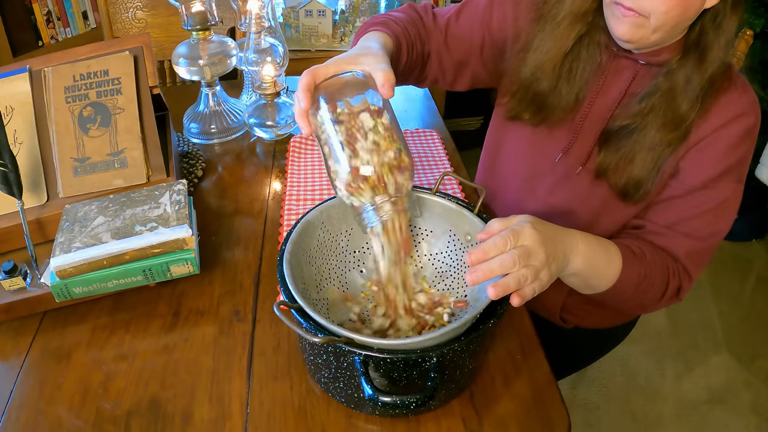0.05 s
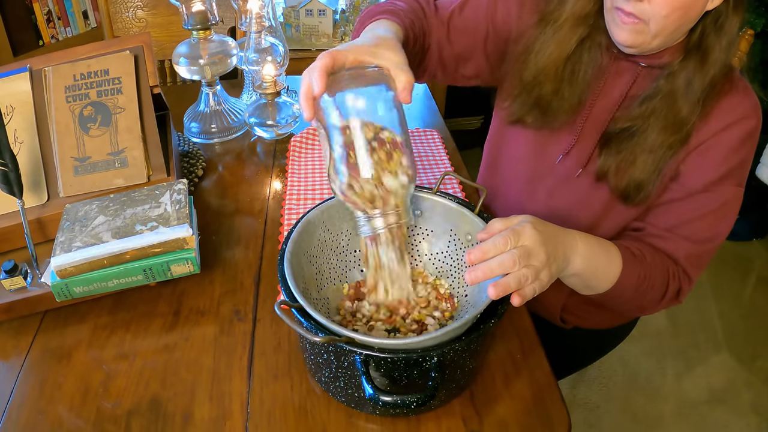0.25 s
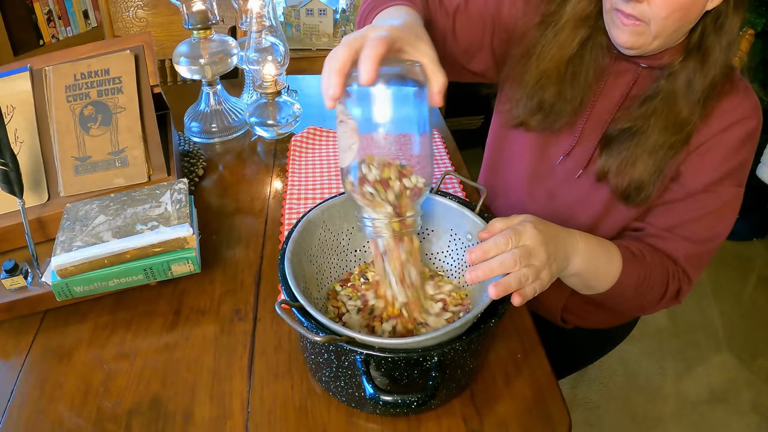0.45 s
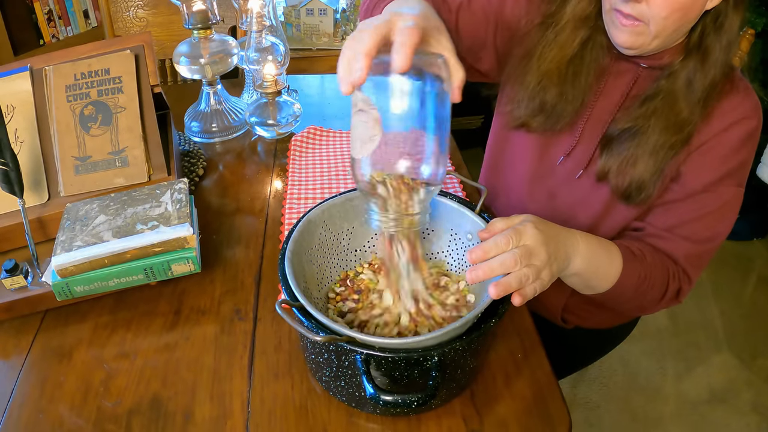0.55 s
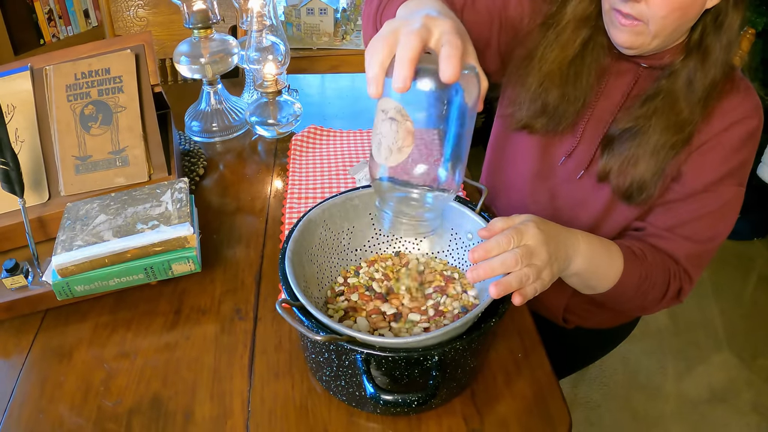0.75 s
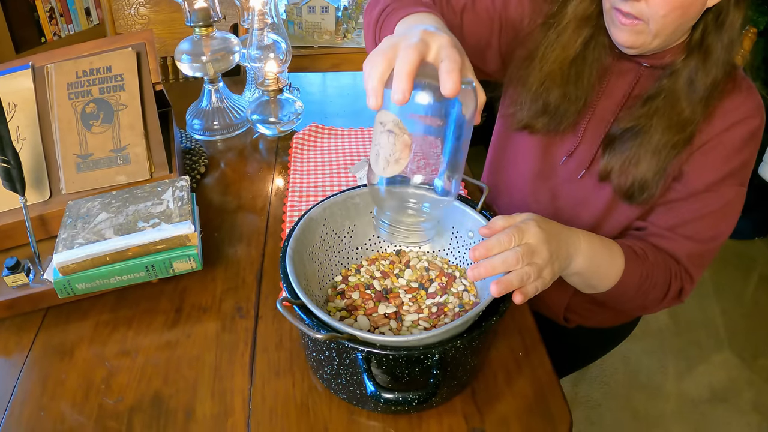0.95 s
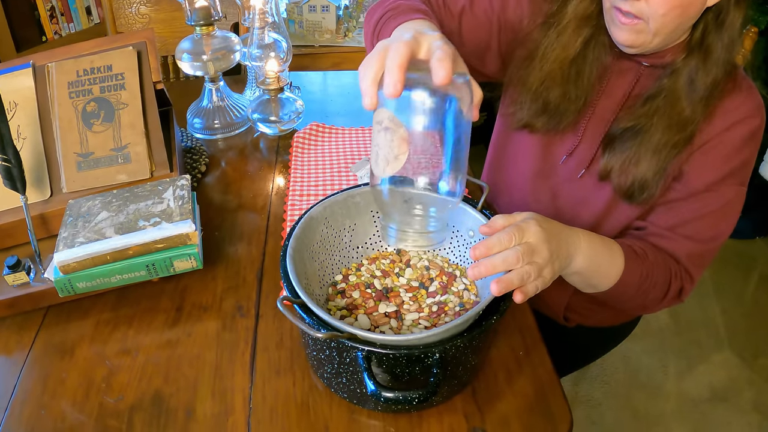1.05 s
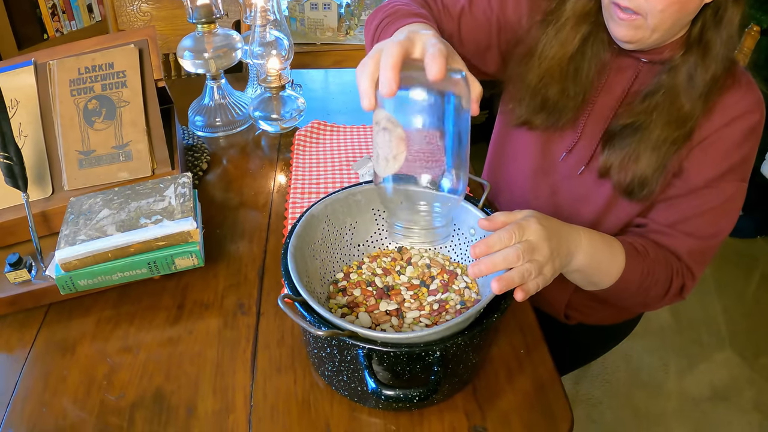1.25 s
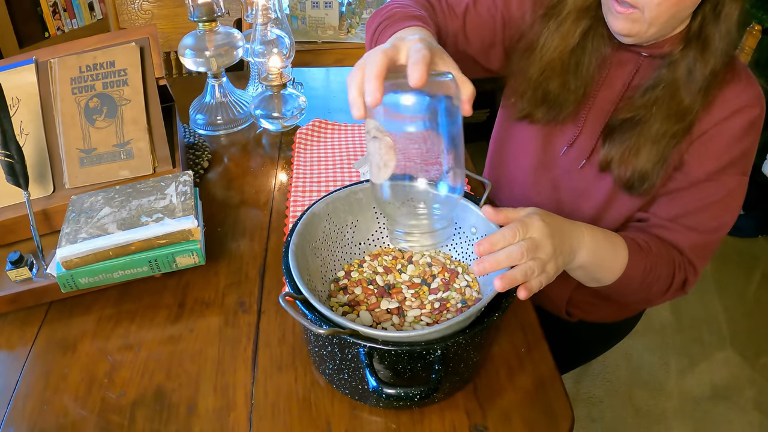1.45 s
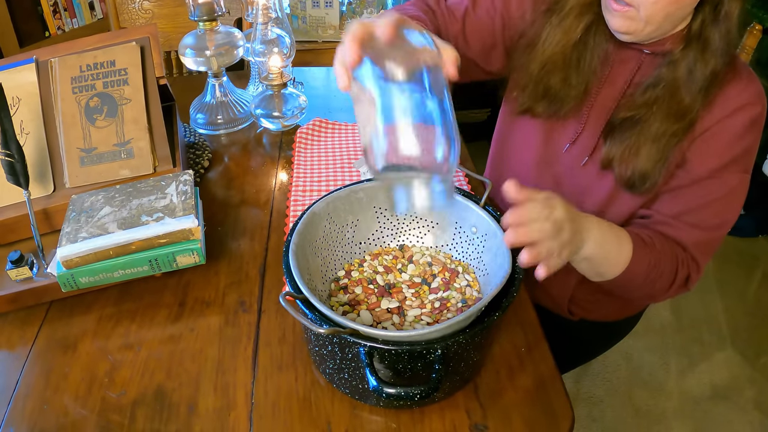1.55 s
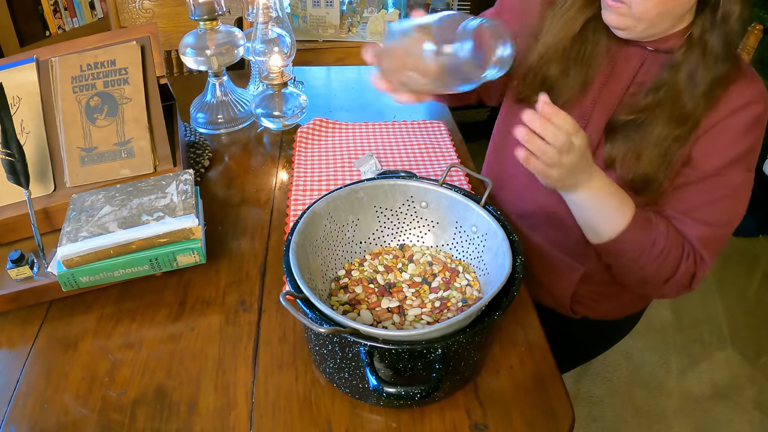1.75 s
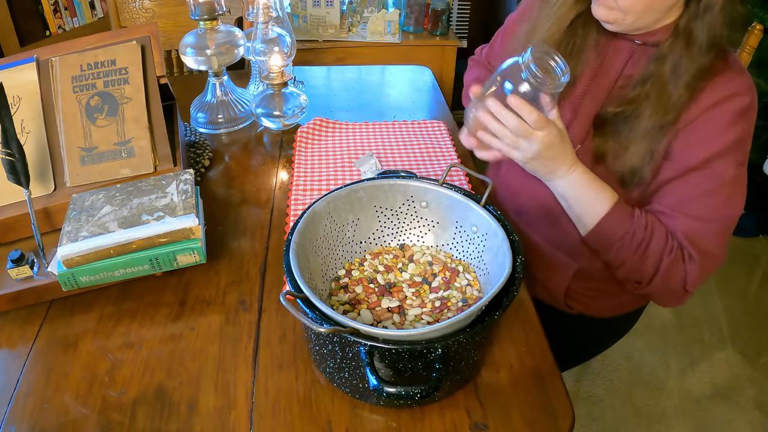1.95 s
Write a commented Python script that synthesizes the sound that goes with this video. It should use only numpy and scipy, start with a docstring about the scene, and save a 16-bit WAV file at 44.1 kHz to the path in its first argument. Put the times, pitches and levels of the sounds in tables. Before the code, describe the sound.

Dry beans rush from a glass jar into a metal colander, first ringing on bare metal with a low thump, then rattling bean on bean; a few stragglers tick, and a quiet kitchen remains, heard close in stereo.

```python
"""Dry beans pour from a glass jar into a metal colander standing in a pot: random impacts excite resonant bodies.
The first beans ring bare metal and shake the table as decaying modes, filtered noise and thumps; then the rattle
turns to bean on bean, and the emptying jar hums through resonances that sharpen. A few last beans drop as dying
noise bursts and clear notes. A quiet kitchen of shaped noise and low wavering tones remains."""
import sys
import numpy as np
from scipy import signal
from scipy.fft import rfft, irfft, next_fast_len
from scipy.io import wavfile
from scipy.ndimage import map_coordinates

SR = 44100
rng = np.random.default_rng(int(sys.argv[2]) if len(sys.argv) > 2 else 0)


def master(y):
    """Save y as 16-bit WAV."""
    cut = np.clip(np.atleast_2d(y).T, -1, 1)
    pcm = np.round(cut * 32767)  # scale
    wavfile.write(sys.argv[1], SR, pcm.astype(np.int16))


def how_loud(loudness_db):
    """Turn decibels into a plain amplitude multiplier (0 dB gives 1, 20 dB gives 10)."""
    steps = np.asarray(loudness_db, float) / 20
    return 10 ** steps


N = 88508

# The stream: time_s, ringing_bare_metal_db, metal_clang_db, bean_on_bean_db, jar_db
POUR_LEVELS = [(0, -19, -19.5, -38.5, -48.5), (.04, -24.5, -23.5, -36.5, -54.5), (.1, -26, -23, -38.5, -56),
               (.17, -27.5, -25.5, -35, -56), (.21, -40.5, -22.5, -32.5, -55.5),
               (.28, -47, -27.5, -33, -53.5), (.35, -58, -36, -36, -52), (.44, -65.5, -39, -38.5, -55),
               (.51, -72, -43, -37.5, -54), (.585, -80, -42, -35, -52), (.68, -95.5, -44.5, -36, -52),
               (.78, -99, -75.5, -38.5, -54), (.82, -109, -65.5, -45.5, -57.5),
               (.865, -95, -94, -48.5, -56.5), (.95, -91, -83, -49.5, -67.5), (1.04, -94, -85, -61, -70),
               (1.12, -100, -100, -81, -73), (1.25, -110, -110, -100, -94)]
# Colander resonances: centre_hz, width_hz, relative_level_db
COLANDER_MODES = [(2987, 23, -7), (3548, 36, -9), (4063, 25, -7), (4470, 14, -14.5), (4604, 20, -17),
                  (4890, 14, -3), (5000, 32, 0), (5760, 20, -10.5), (5870, 49, -6.5), (6440, 38, -3),
                  (7100, 19, -8.5), (7680, 45, -11)]
# Dense upper modes of the metal: frequency_hz, relative_level_db (per Hz)
CLANG_SPECTRUM = [(1060, -66), (2650, -41.5), (2900, -16), (3320, -20.5), (3510, -10.5), (4900, -2),
                  (6480, -1), (12100, -19.5), (15500, -46.5)]
# One bean on another: frequency_hz, relative_level_db (per Hz)
CLICK_SPECTRUM = [(880, -21), (1500, -26), (2650, -18), (2860, -10), (3580, -17), (4800, -13), (5090, -8.5),
                  (6900, 0), (11100, -18.5), (12800, -15.5), (15500, -31.5)]
# Resonances of the empty jar: centre_hz, width_hz, relative_level_db
JAR_MODES = [(362, 42, 5.5), (537, 113, -2.5), (908, 38, 0), (1411, 51, -0.5), (1985, 200, -3),
             (2940, 470, -7.5)]
# Low shaking of pot and table: time_s, level_db
SHAKE_LEVELS = [(0, -42.5), (.03, -32.5), (.07, -36.5), (.1, -39.5), (.14, -37.5), (.17, -48), (.21, -48.5),
                (.26, -60.5), (.33, -99)]
# Spectrum of that shaking: frequency_hz, relative_level_db (per Hz)
THUD_SPECTRUM = [(12, -34.5), (20, 3), (123, -3), (214, -11.5), (300, -18), (500, -37.5), (1100, -120)]
# The heaviest clump lands, later a soft bump: centre_s, level_db, pitch_hz, length_s (standard deviation)
THUMPS = [(0.053, -21.5, 86, 0.0033), (1.539, -45, 42.3, .008)]
# Kitchen background: frequency_hz, relative_level_db (per Hz)
HUSH_SPECTRUM = [(12, -35.5), (20, -2.5), (64, 2), (106, -13.5), (170, -4), (478, -14.5), (535, -23),
                 (1870, -28), (2150, -39), (2700, -38), (15500, -69.5)]
# Level of background and hum together: time_s, level_db
HUSH_LEVELS = [(0, -41.5), (.4, -70), (.75, -64.5), (.85, -57.5), (1.05, -63.5), (1.2, -60.5), (1.45, -59),
               (1.6, -56), (1.8, -56.5), (2.01, -58.5)]
# Hum tones: pitch_hz, mean_level_db (peak over the background rms)
HUM_TONES = [(60, -9), (161, -4.5), (290, -15.5)]
# A faint narrow band swells and fades: time_s, level_db
MURMUR_LEVELS = [(1.2, -93), (1.4, -81.5), (1.7, -100)]
# Faint treble hiss: time_s, level_db
HISS_LEVELS = [(1.4, -94), (1.57, -82.5), (1.7, -91), (2.01, -84)]
# Its spectrum: frequency_hz, relative_level_db (per Hz)
HISS_SPECTRUM = [(1800, -44), (2300, -1), (7000, -7.5), (15000, -30.5)]
# Beans that strike a clear note: start_s, level_db, pitch_hz, t60_s
CLEAR_NOTES = [(.002, -25, 3548, 0.2034), (.015, -37, 2987, .4), (.044, -11, 6680, .03),
               (.1246, -13, 6210, .03), (.142, -27.5, 3006, .15), (.4324, -23.5, 6630, .03),
               (.501, -27, 2990, 0.036), (.548, -25, 6470, .06), (.641, -32.5, 5200, .08),
               (.889, -52, 2825, 0.2), (.945, -40, 5540, .13), (1.064, -47, 4346, 0.029),
               (1.099, -59.5, 5557, 0.17), (1.065, -51.5, 2898, .04), (1.097, -51.5, 6510, 0.094)]
# Last single beans: start_s, rattle_db, treble_db, t60_s
LAST_BEANS = [(0.873, -41.5, -54.5, 0.079), (.892, -30.5, -39, 0.079), (.899, -33.5, -43, 0.063),
              (0.9363, -42.5, -49.5, .03), (.973, -43, -63, 0.05), (0.998, -39.5, -48.5, 0.049),
              (1.065, -47, -81, 0.095), (1.097, -49, -82, 0.038), (1.556, -74.5, -95.5, 0.15)]
# Knocks, the first three giving the last beans' clacks their lower body: start_s, dull_part_db, bright_part_db
KNOCKS = [(1.065, -58, -59), (1.075, -59.5, -54), (1.096, -62, -57.5), (1.208, -60.5, -78),
          (1.251, -55, -69.5)]
# Spectrum of a knock: frequency_hz, relative_level_db (per Hz)
KNOCK_SPECTRUM = [(100, -12), (400, -3.5), (1000, -14), (2400, -12.5), (5000, -16), (7000, -64)]
# Decay of the room: frequency_hz, t60_s
ROOM_DECAY = [(300, 0.27), (3000, 0.35), (15000, 0.28)]
# Gain of the side signal below the top treble, narrowing the image: time_s, side_gain_db
SIDE_GAIN = [(0, -2), (.35, -6), (.45, -11), (.75, -15), (1.1, -14), (1.2, -51)]
# Two close ports before SIDE_GAIN: frequency_hz, left_over_right_db, left_lead_rad, unrelated_side_db
PORTS = [(100, -8.5, .2, -16), (600, -5, .5, -6.5), (2500, 0, -.5, -11), (7000, -1.7, -.35, -3),
         (10960, 2.5, .1, -10.5)]

METAL_PER_S, BEANS_PER_S, JAR_PER_S = 2500, 3500, 1500  # mean impacts per second
TINKLE_COUNT, TINKLE_HZ, TINKLE_T60_S = 400, 6385, 0.026
TINKLE_PITCH_SPREAD, TINKLE_SIZE_SPREAD_DB = .12, 2.5  # standard deviations, pitch in natural log
TINKLE_OVER_BEANS_DB = -0.5
JAR_EMPTY_S, FULL_WIDENING = .5, 4.2  # the jar rings freely from here; resonances this much wider while full
MURMUR_HZ, MURMUR_WIDTH_HZ = 2450, 200
KNOCK_SPLIT_HZ, KNOCK_T60_S = 2600, 0.043
ROOM_DB, TOP_HZ, TOP_SIDE_DB = -8.5, 11500, -0.5


def unit(x):
    """Normalise mean power: the rms becomes 1."""
    return x / np.sqrt(np.mean(x ** 2) + 1e-20)


def along(points, hz):
    """Interpolate (Hz, value) points on a logarithmic frequency axis."""
    f, v = np.transpose(points)
    return np.interp(np.log(hz + 1), np.log(f + 1), v)


def curves(rows):
    """Interpolate linearly in time: one curve for each column after the time."""
    s, *columns = np.transpose(rows)
    return [np.interp(np.arange(N) / SR, s, column) for column in columns]


def wobble(rate):
    """Smooth random modulation: a spline through Gaussian knots, rate of them a second."""
    knots = rng.standard_normal(int(N * rate / SR) + 4)
    return map_coordinates(knots, [np.arange(N) * rate / SR])


def filtered(x, response):
    """Linear filtering: the spectrum times a complex response of frequency."""
    m = 2 * next_fast_len(N // 2 + SR // 4)
    spectrum = rfft(x, m) * response(np.fft.rfftfreq(m, 1 / SR))
    return irfft(spectrum, m)[..., :N]


def shaped_noise(points):
    """Stationary noise of rms 1 whose spectrum follows (Hz, dB) points."""
    return unit(filtered(rng.standard_normal(N), lambda hz: how_loud(along(points, hz))))


def colour(points):
    """Minimum phase: folding the cepstrum makes a causal response from (Hz, dB) points."""
    def response(hz):
        cepstrum = irfft(np.log(how_loud(along(points, hz)) + 1e-5))
        half = len(cepstrum) // 2
        cepstrum[1:half] *= 2
        cepstrum[half + 1:] = 0
        return np.exp(rfft(cepstrum))
    return response


def modes(rows):
    """Modal superposition: causal second-order resonances summed with alternating sign."""
    def response(f):
        total = 0
        for k, (centre, width, db) in enumerate(rows):
            resonance = 1j * f * width / (centre * centre - f * f + 1j * f * width)
            total = total + (-1) ** k * how_loud(db) * resonance
        return total
    return response


def blows(per_s, spread_db):
    """Shot noise: impacts of random time, sign and uneven size, scaled to rms 1."""
    chance, sign, size = rng.random((3, N))
    struck = chance < per_s / SR
    return unit(struck * np.sign(sign - .5) * how_loud(-spread_db * np.log(size + .01)))


def scaled(hits, level_db, response):
    """Source and body: impacts at a level excite a filter whose steady output has rms 1."""
    return filtered(hits * how_loud(level_db), response) / np.std(filtered(hits, response))


def bursts(rows, response):
    """Transient excitation: decaying noise bursts (s, dB, t60 s) drive a body normalised on steady noise."""
    x, t = np.zeros(N + SR), np.arange(SR // 5) / SR
    onset = 1 - np.exp(-t / .0012)
    for s, db, t60 in rows:
        x[round(s * SR):][:len(t)] += how_loud(db - 60 * t / t60) * onset * rng.standard_normal(len(t))
    return filtered(x[:N], response) / filtered(rng.standard_normal(N), response).std()


def rung(hits, t60):
    """High modal density: each impact rings as decaying noise, new for every blow."""
    t = np.arange(SR // 10) / SR
    power = signal.fftconvolve(hits ** 2, how_loud(-2 * 60 * t / t60))[:N]
    return unit(np.sqrt(np.abs(power)) * rng.standard_normal(N))


def tinkle(level_db):
    """Damped free vibration: short notes of chance pitch as beans glance off metal and glass."""
    r, t = rng.standard_normal((TINKLE_COUNT, 2)), np.arange(SR // 20) / SR
    at = rng.integers(0, int(1.2 * SR), TINKLE_COUNT)
    hz = TINKLE_HZ * np.exp(TINKLE_PITCH_SPREAD * r[:, :1])
    note_db = level_db[at, None] + TINKLE_SIZE_SPREAD_DB * r[:, 1:] - 60 * t / TINKLE_T60_S
    notes = how_loud(note_db) * np.sin(2 * np.pi * hz * t)
    places = at[:, None] + np.arange(len(t))
    return np.bincount(places.ravel(), notes.ravel(), N)[:N]


def jar(level_db):
    """Damping by the contents: wide resonances crossfade to sharp ones as the jar empties."""
    empty = np.clip(np.arange(N) / SR / JAR_EMPTY_S, 0, 1) ** 2
    damped_modes = [(hz, FULL_WIDENING * width, db) for hz, width, db in JAR_MODES]
    full_jar = scaled(blows(JAR_PER_S, 3), level_db, modes(damped_modes))
    free_jar = scaled(blows(JAR_PER_S, 2.62), level_db, modes(JAR_MODES))
    return np.sqrt(1 - empty) * full_jar + np.sqrt(empty) * free_jar


def pour():
    """Impact excitation: the stream hits bare metal, then other beans, and rattles out of the jar."""
    ring_db, clang_db, beans_db, jar_db = curves(POUR_LEVELS)
    hits = blows(METAL_PER_S, 1.4)
    clump_db = 1.2 * wobble(130)
    stiff = colour([(1500, -24.0), (2600, -13.5), (2900, 0.0)])  # weakens the ringing below 2900 Hz
    metal = scaled(hits, ring_db + clump_db, lambda hz: modes(COLANDER_MODES)(hz) * stiff(hz))
    clang = scaled(rung(hits, 0.011), clang_db + clump_db, colour(CLANG_SPECTRUM))
    beans = scaled(blows(BEANS_PER_S, 1.9), beans_db + 1.3 * wobble(84), colour(CLICK_SPECTRUM))
    return metal + clang + beans + tinkle(beans_db + TINKLE_OVER_BEANS_DB) + jar(jar_db)


def shake():
    """Forced low vibration: falling weight shakes pot and table as noise, with deep Gaussian thumps."""
    t = np.arange(N) / SR
    thumps = np.zeros(N)
    for s, db, hz, length in THUMPS:
        envelope = np.exp(-((t - s) / length) ** 2 / 2)
        thumps += how_loud(db) * envelope * np.sin(2 * np.pi * hz * (t - s))
    return thumps + how_loud(curves(SHAKE_LEVELS)[0]) * shaped_noise(THUD_SPECTRUM)


def kitchen():
    """Stationary background: shaped noise, a wavering hum, a passing narrow murmur and a faint hiss."""
    t = np.arange(N) / SR
    hush = shaped_noise(HUSH_SPECTRUM) * how_loud(1.3 * wobble(9))
    hum = np.zeros(N)
    for hz, db in HUM_TONES:
        hum += how_loud(db + 3 * wobble(12)) * np.sin(2 * np.pi * hz * t + 0.63 * wobble(14))
    narrow_band = modes([(MURMUR_HZ, MURMUR_WIDTH_HZ, 0)])
    murmur = how_loud(curves(MURMUR_LEVELS)[0]) * unit(filtered(rng.standard_normal(N), narrow_band))
    hiss = how_loud(curves(HISS_LEVELS)[0]) * shaped_noise(HISS_SPECTRUM)
    return murmur + (hush + hum) * how_loud(curves(HUSH_LEVELS)[0]) + hiss


def clear_notes():
    """Single-mode decay: some beans strike a clear note that wavers in level and phase."""
    ring, t = np.zeros(N + SR), np.arange(SR // 4) / SR
    onset = 1 - np.exp(-t / 0.0015)
    for s, db, hz, t60 in CLEAR_NOTES:
        envelope = how_loud(db - 60 * t / t60 + 1.5 * wobble(120)[:len(t)]) * onset
        phase = 2 * np.pi * hz * t + .6 * wobble(90)[:len(t)]
        ring[round(s * SR):][:len(t)] += envelope * np.sin(phase)
    return ring[:N]


def last_beans():
    """Isolated impacts: each last bean is a short rattle with a separate treble edge."""
    click = colour(CLICK_SPECTRUM)

    def rattle_band(hz):
        return click(hz) / (1 + (hz / 8500) ** 8) / (1 + (4600 / (hz + 1)) ** 4)

    def treble_band(hz):
        return click(hz) / (1 + (8500 / (hz + 1)) ** 8)

    rattle = bursts([(s, db, t60) for s, db, _, t60 in LAST_BEANS], rattle_band)
    return rattle + bursts([(s, db, t60) for s, _, db, t60 in LAST_BEANS], treble_band)


def knocks():
    """Two-band impact: each knock has a dull and a bright part; the first ones give the last beans' clacks
    their lower body."""
    body = colour(KNOCK_SPECTRUM)
    low = lambda hz: 1 / (1 + (hz / KNOCK_SPLIT_HZ) ** 8)
    dull = bursts([(s, db, KNOCK_T60_S) for s, db, _ in KNOCKS], lambda hz: body(hz) * low(hz))
    bright = bursts([(s, db, KNOCK_T60_S) for s, _, db in KNOCKS], lambda hz: body(hz) * (1 - low(hz)))
    return dull + bright


def room(x):
    """Reverberation: a delayed diffuse tail in which each frequency dies at its own speed."""
    hz, t, z = signal.stft(rng.standard_normal(SR // 2), SR, nperseg=256)
    decay = how_loud(-60 * t / along(ROOM_DECAY, hz)[:, None])
    tail = signal.istft(z * decay, SR, nperseg=256)[1]
    delayed = np.pad(x, (150, 0))  # samples
    return signal.fftconvolve(delayed, tail / np.linalg.norm(tail))[:N]


def stereo(mid):
    """Interchannel coherence at two close ports: the side is partly tied to the middle, partly phase-scattered."""
    port = lambda k, hz: along([(row[0], row[k]) for row in PORTS], hz)
    low = lambda hz: 1 / (1 + (hz / TOP_HZ) ** 40)
    # the side over the middle that gives the left-to-right ratio and lead
    ratio = lambda hz: np.tanh((np.log(how_loud(port(1, hz))) + 1j * port(2, hz)) / 2)
    z = signal.stft(mid, nperseg=256)[2]
    scattered = signal.istft(z * np.exp(2j * np.pi * rng.random(z.shape)), nperseg=256)[1][:N]
    scattered = scattered * mid.std() / scattered.std()
    tied = filtered(mid, lambda hz: low(hz) * ratio(hz))
    loose = filtered(scattered, lambda hz: low(hz) * how_loud(port(3, hz)))
    top = filtered(scattered - .15 * mid, lambda hz: 1 - low(hz))
    side = how_loud(curves(SIDE_GAIN)[0]) * (tied + loose) + how_loud(TOP_SIDE_DB) * top
    return np.array([mid + side, mid - side])


def scene():
    """Superposition: the beans with their room, over table and kitchen, heard in stereo."""
    beans = pour() + clear_notes() + last_beans() + knocks()
    return stereo(beans + how_loud(ROOM_DB) * room(beans) + shake() + kitchen())


def low_pass(x):
    """Removes everything above the highest recorded frequency."""
    return signal.sosfilt(signal.butter(12, 15680, fs=SR, output="sos"), x)


def record(dry):
    """Unity gain: the stereo scene is already the finished mix."""
    return low_pass(dry)


dry = scene()
out = record(dry)
master(out)
```